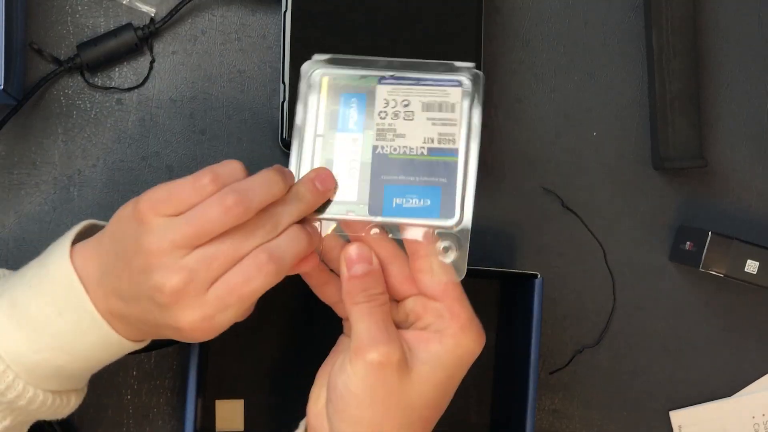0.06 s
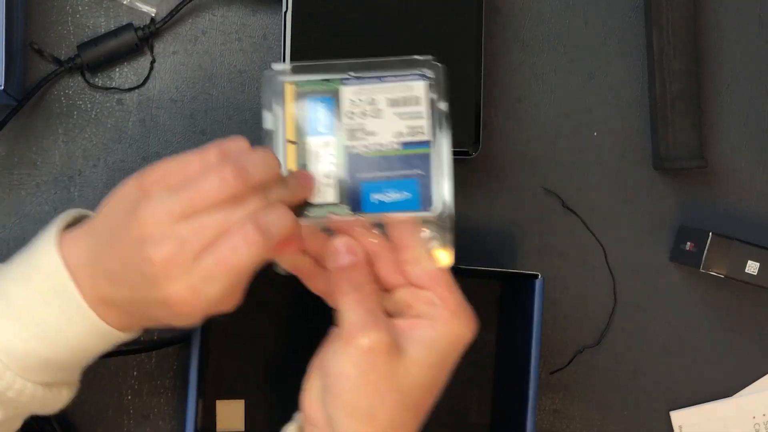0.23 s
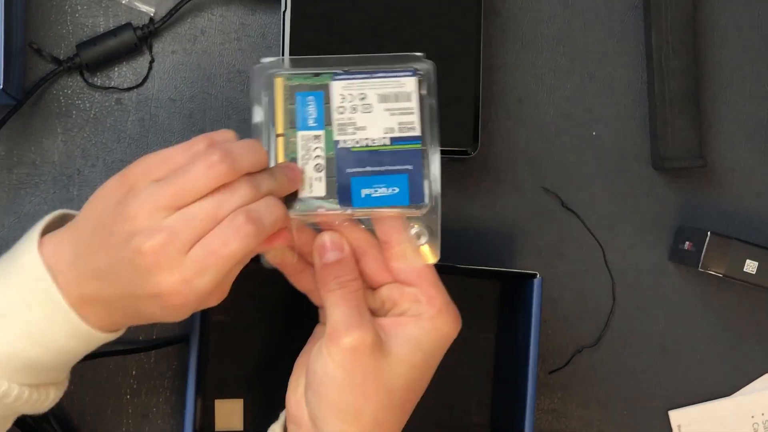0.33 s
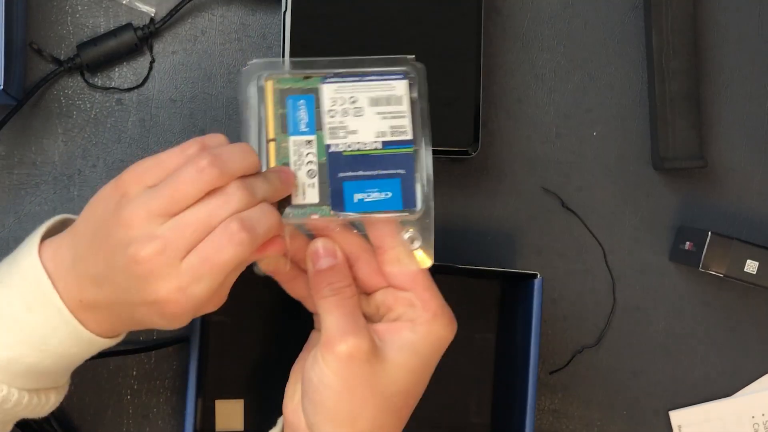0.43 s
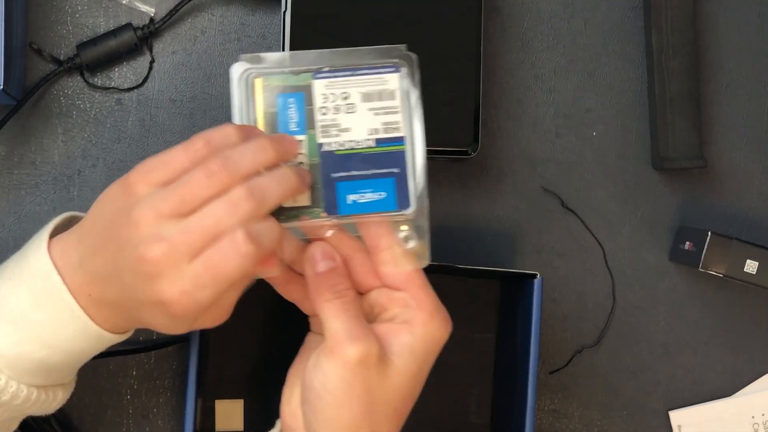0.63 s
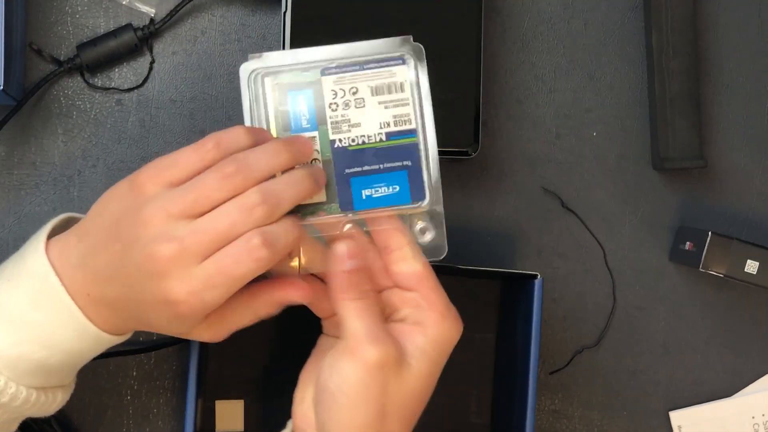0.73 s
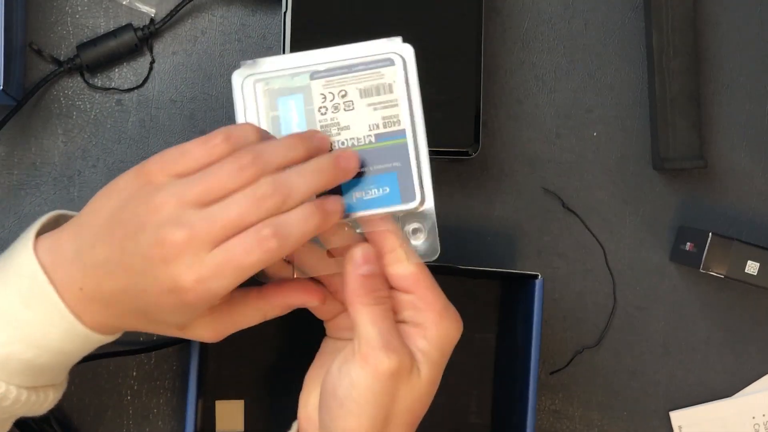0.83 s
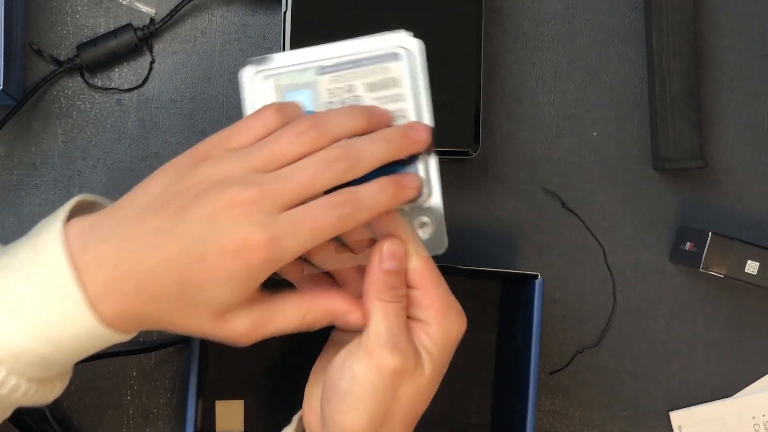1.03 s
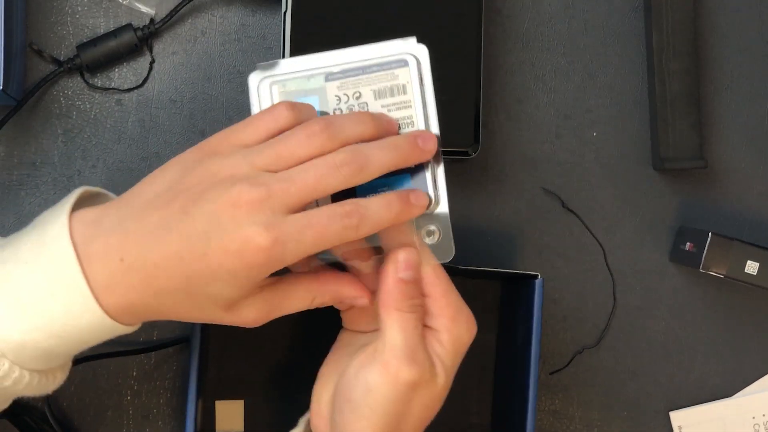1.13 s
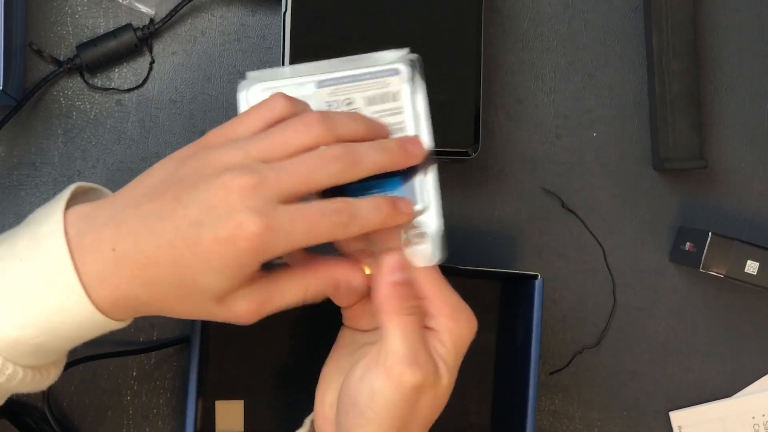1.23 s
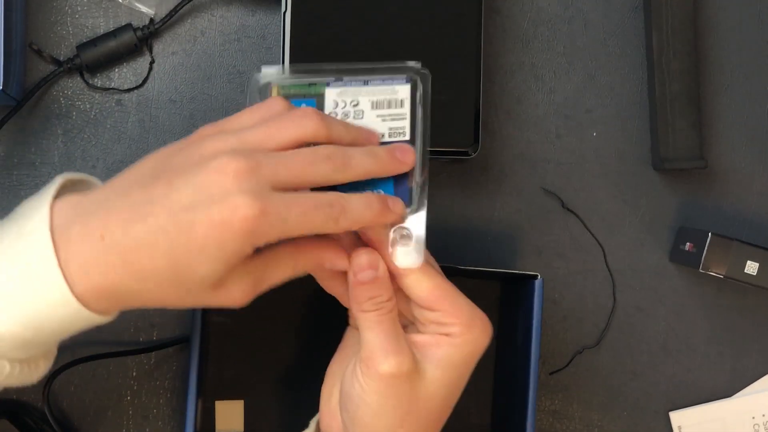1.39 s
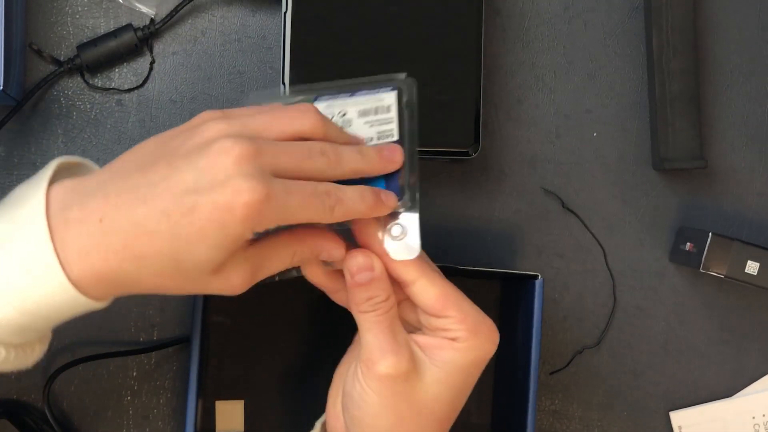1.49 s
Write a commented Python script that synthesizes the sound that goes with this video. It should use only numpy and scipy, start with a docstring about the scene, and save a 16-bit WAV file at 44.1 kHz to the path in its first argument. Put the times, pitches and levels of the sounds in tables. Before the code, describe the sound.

Sharp snaps of a rigid plastic pack being pried open by hand, close up. A faint low crackle comes at the start, then a loud, bright double-edged snap at about 0.2 s and a second, less bright, harder clack at 0.53 s. Faint ticks follow around 0.7-0.9 s, with small plastic creaks at 1.15-1.35 s. Quiet small room, short echo, faint steady hiss and soft rustle.

```python
"""A small quiet room, close above a desk, where fingers pry at a rigid clear plastic pack.
The rim lets go twice with sharp snaps: runs of tiny slips that ring the modes of the shell.
Faint ticks and creaks of handling are weaker runs that wake a few modes; low flops are short sines.
Room echo is made of sparse random taps, and shaped noise gives steady air and a soft low rustle."""
import sys
import numpy as np
from scipy import signal
from scipy.io import wavfile
from scipy.ndimage import uniform_filter1d

SR = 44100
rng = np.random.default_rng(int(sys.argv[2]) if len(sys.argv) > 2 else 0)


def pcm_store(signal):
    """Save signal as 16-bit PCM."""
    levels = np.round(np.clip(np.atleast_2d(signal), -1, 1) * 32767)
    wavfile.write(sys.argv[1], SR, levels.astype(np.int16).T)


def voltage_ratio(level):
    """Linear amplitude factor for a level in decibels (scalar or array-like)."""
    return 10 ** (np.asarray(level, float) / 20)


N = 68355  # length in samples


def read(points, hz):
    """Reads a table of (Hz, value) points along a log-frequency axis."""
    f, value = np.transpose(points)
    return np.interp(np.log(hz + 1), np.log(f + 1), value)


def add(mix, start_s, sound):
    """Mixes a sound in at a time, cutting off what runs past the end."""
    part = mix[..., round(start_s * SR):][..., :sound.shape[-1]]
    part += sound[..., :part.shape[-1]]


def noise(shape, patchy_db):
    """Noise of rms 1 with a given spectrum, made uneven by patches that drift over time and pitch."""
    frames, hz = N // 256 + 5, np.fft.rfftfreq(1024, 1 / SR)
    real, imaginary, patches = rng.standard_normal((frames, 513, 3)).T
    patches = uniform_filter1d(patches, size=14, axis=0)  # smooth over pitch
    patches = uniform_filter1d(patches, size=8, axis=1)  # smooth over time
    level_db = read(shape, hz)[:, None] + patchy_db * patches / patches.std()
    spectrum = (real + 1j * imaginary) * voltage_ratio(level_db)
    x = signal.istft(spectrum, nperseg=1024, noverlap=768)[1][:N]
    return x / x.std()


# Spectrum of the steady room air and hiss. Each row: frequency in Hz, relative level in dB per Hz.
AIR_SHAPE = [(18, -63), (30, -20), (239, -0.5), (461, -2.5), (780, -2), (1590, -6.5), (2060, -5.5),
             (2540, -12.5), (4190, -11.5), (14400, -24), (16000, -28)]
# Loudness of the soft low rustle over time. Each row: time in seconds, rms level in dB.
RUSTLE_LEVEL = [(0, -53), (.05, -58), (.15, -62), (.3, -61.5), (.5, -72), (0.749, -67), (.9, -66.5),
                (1.05, -64.5), (1.2, -60), (1.33, -59.5), (1.45, -69.5), (1.55, -64.5)]
# Spectrum of that rustle. Each row: frequency in Hz, relative level in dB per Hz.
RUSTLE_SPECTRUM = [(100, -26), (250, 5), (500, 3), (1500, -18.5), (3000, -8), (8000, -27)]
AIR_DB = -59.5  # rms


def background():
    """Steady room air and hiss, with a soft low rustle that comes and goes: both are shaped noise."""
    s, db = np.transpose(RUSTLE_LEVEL)
    rustle_level = voltage_ratio(np.interp(np.arange(N) / SR, s, db))
    air = voltage_ratio(AIR_DB) * noise(AIR_SHAPE, patchy_db=0.3)
    return air + rustle_level * noise(RUSTLE_SPECTRUM, patchy_db=1.1)


# How fast the echo dies. Each row: frequency in Hz, time to fall by 60 dB in seconds.
ROOM_DECAY = [(100, 0.27), (260, 0.32), (700, 0.12), (1840, 0.21), (4850, 0.2), (12800, 0.16)]
# How strong the echo starts at each pitch. Each row: frequency in Hz, relative level in dB.
ROOM_START = [(100, -48), (500, 0.5), (1500, -9.8), (4000, -3.96), (9000, -14), (16000, -2.5)]
ROOM_GAP_S = 0.00084  # silence before the echo, which then takes as long again to reach full strength


def room(x):
    """Echo from the walls: sparse taps of random sign, each band dying at its own speed."""
    taps = np.zeros(SR // 2)
    at = np.arange(0, len(taps) - 12, 12)
    taps[at + rng.integers(0, 12, len(at))] = rng.choice([-1., 1.], len(at))
    taps *= np.clip(np.arange(len(taps)) / SR / ROOM_GAP_S - 1, 0, 1)
    hz, t, z = signal.stft(taps, SR, nperseg=128)
    level_db = read(ROOM_START, hz)[:, None] - 60 * t / read(ROOM_DECAY, hz)[:, None]
    tail = signal.istft(z * voltage_ratio(level_db), SR, nperseg=128)[1]
    return signal.fftconvolve(x, tail / np.linalg.norm(tail))[:N]


# Low flops of the whole sheet. Each row: start in seconds, level in dB before the doubling below,
# frequency in Hz, time to fall by 60 dB in seconds.
SHEET_FLOPS = [(0.117, -42.5, 390, 0.0097), (.2105, -9.5, 135, 0.015), (0.59, -40.5, 324, 0.012),
               (1.4, -57, 376, 0.077)]


def flops():
    """The whole sheet bends over: a few low cycles with a soft start."""
    out, t = np.zeros(N), np.arange(4000) / SR
    for start_s, db, hz, t60 in SHEET_FLOPS:
        soft_start = 1 - np.exp(-t * hz * 2)
        add(out, start_s, voltage_ratio(db - 60 * t / t60) * soft_start * 2 * np.sin(2 * np.pi * hz * t))
    return out


SLIPS_PER_S = 13000  # average rate of the stronger slips
SLIP_SPREAD_DB = 0.5  # how unequal the slips are


def slips(length_s, rise, draw):
    """A quick run of tiny slips of random size and sign that swells and dies."""
    u = np.linspace(0, 1, max(round(length_s * SR), 30) + 2)[1:-1]
    rise = np.clip(rise, 0.05, 0.95)
    on, size, sign = draw[:, :len(u)]
    swell = np.minimum(u / rise, (1 - u) / (1 - rise))
    strength = 0.14 + (on < SLIPS_PER_S / SR)  # weak grit everywhere, stronger slips here and there
    return swell * strength * voltage_ratio(-SLIP_SPREAD_DB * np.log(size + 0.003)) * np.sign(sign - 0.5)


def ring(modes, cycles, weight_db=0):
    """Modes answering one click, neighbours in opposite phase, 60 dB down after some cycles; energy 1."""
    t, (hz, db) = np.arange(2500)[:, None] / SR, np.transpose(modes)
    level = voltage_ratio(db + weight_db - 60 * t * hz / cycles) * np.sqrt(hz)
    x = (level * np.sin(2 * np.pi * hz * t)) @ (-1.) ** np.arange(len(hz))
    x = signal.lfilter(*signal.butter(N=2, Wn=160, btype="high", fs=SR), x)
    return x / np.linalg.norm(x)


def struck(force, answer, db):
    """A run of slips sent through the answer of the modes, set to a given energy."""
    x = np.convolve(force, answer)
    return voltage_ratio(db) * x / np.linalg.norm(x)


# Modes of the shell, in four groups from low to high.
# Each row: frequency in Hz, strength in dB before ring() favours the higher ones.
PANEL_MODES = [(450, -4.5), (600, -9.5), (850, -0.5), (1130, 3), (1370, 4), (1710, 6.77), (2000, 1.5)]
RIM_MODES = [(2600, 5), (3000, -13.5), (3450, 8.2), (3850, 6), (4250, 1), (4900, 7), (5500, -27)]
EDGE_MODES = [(5900, -1), (6450, 9.9), (7300, 10.5), (8400, 8), (9200, -42), (10000, -26)]
CORNER_MODES = [(11300, 8), (12300, 9.5), (13300, 8.5), (14500, 10), (15500, 8), (16400, -19)]
# Faint ticks and creaks as the fingers shift. Each row: start in seconds, slip length in seconds,
# energy in dB, centre frequency in Hz, distance in octaves at which the modes are 6 dB weaker.
FINGER_TICKS = [(.002, 0.0027, -36, 1200, 1.3), (0.007, 0.012, -22.5, 980, 1.1),
                (0.02, 0.0016, -26.5, 1110, 0.62), (.027, 0.0024, -28.5, 910, 0.29),
                (0.7, 0.0015, -33, 6160, 1.5), (.740, .004, -33, 1682, 0.4),
                (0.854, 0.0029, -31.5, 1595, 0.35), (0.859, 0.025, -29, 1500, 0.77),
                (.919, 0.0018, -37.5, 3970, 1.2), (1.123, 0.0035, -39, 1980, 0.41),
                (1.1524, 0.0021, -22, 1920, 1.86), (1.157, 0.027, -21.5, 1460, 0.98),
                (1.249, 0.019, -29, 1800, 1.2), (1.26, 0.053, -27.5, 1920, 0.42),
                (1.272, 0.0035, -33.5, 2020, 0.14), (1.284, 0.0045, -26.5, 2100, 0.12),
                (1.2942, 0.0032, -25.5, 1780, 0.98), (1.302, 0.019, -28, 1200, 0.96),
                (1.329, 0.015, -31, 1004, 0.37), (1.472, 0.0066, -35, 2500, 1.3),
                (1.536, 0.0077, -36, 3400, .2)]


def ticks():
    """Each light touch mainly wakes the modes near its own pitch; fingers on the sheet damp them."""
    out, modes = np.zeros(N), PANEL_MODES + RIM_MODES + EDGE_MODES + CORNER_MODES
    draws = rng.random((len(FINGER_TICKS), 3, 3000))
    for (start_s, length_s, db, hz, spread), draw in zip(FINGER_TICKS, draws):
        near_db = -6 * (np.log2(np.transpose(modes)[0] / hz) / spread) ** 2
        force = slips(length_s, 0.14, draw)
        add(out, start_s, struck(force, ring(modes, 13, near_db), db))
    return out


# Snaps of the rim letting go. Each row: start in seconds, slip length in seconds, share of it spent
# rising, then the energy in dB given to the panel, rim, edge and corner modes.
RIM_SNAPS = [(0.2095, 0.0071, 0.3, 3, -3, 7.5, 4.5), (0.2194, 0.0028, 0.16, -3, 7.5, 8, 6.5),
             (.5240, 0.0043, 0.38, 5.5, 9.5, -9.5, -11), (0.5282, 0.0074, 0.14, -7, -7.5, -6.5, -19),
             (0.5318, 0.0019, 0.17, -20, -1.5, -35, -12), (0.5767, 0.0014, 0.22, -47, -22.5, -42, -42)]
RING_CYCLES = 20  # close by, cycles until a mode is 60 dB down
FAR_CYCLES = 9  # heard from all sides at once, the modes blur together


def shell():
    """Each snap drives the groups of modes; gives the close sound and what each sends to the walls."""
    groups = PANEL_MODES, RIM_MODES, EDGE_MODES, CORNER_MODES
    near, far = np.zeros(N), np.zeros((len(groups), N))
    draws = rng.random((len(RIM_SNAPS), 3, 900))
    for (start_s, length_s, rise, *db), draw in zip(RIM_SNAPS, draws):
        force = slips(length_s, rise, draw)
        peak_s = start_s + rise * length_s
        for k, modes in enumerate(groups):
            add(near, start_s, struck(force, ring(modes, RING_CYCLES), db[k]))
            add(far[k], peak_s, struck([1], ring(modes, FAR_CYCLES), db[k]))
    return near, far


# How strongly each source feeds the room echo, in dB: panel, rim, edge, corner, ticks, flops.
ECHO_SHARES = [-5.5, -8, -0.5, -7, -6.5, -7]


def scene():
    """The pack heard directly, its echo from the room, and the background."""
    (near, far), small, low = shell(), ticks(), flops()
    wet = sum(voltage_ratio(db) * room(x) for db, x in zip(ECHO_SHARES, [*far, small, low]))
    return (near + small + low + wet + background())[None]


def roll_off(x):
    """The treble ends steeply here."""
    return signal.sosfilt(signal.butter(12, 16830, fs=SR, output="sos"), x)


def record(dry):
    """Removes the lowest rumble, rounds off peaks softly and limits the treble."""
    x = signal.lfilter(*signal.butter(N=2, Wn=66, btype="high", fs=SR), dry)
    x = np.tanh(x)
    low_pass = signal.firwin(255, 16600, window=("kaiser", 9), fs=SR)
    x = signal.oaconvolve(x, low_pass[None], "same")
    return roll_off(x)


dry = scene()
out = record(dry)
pcm_store(out)
```